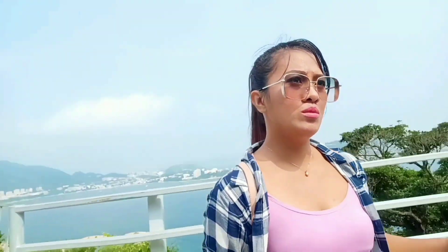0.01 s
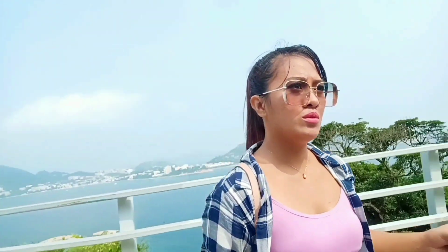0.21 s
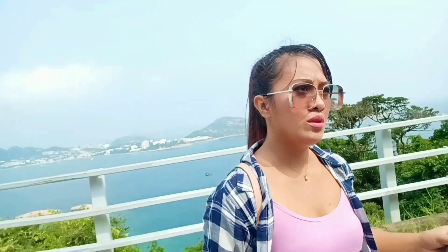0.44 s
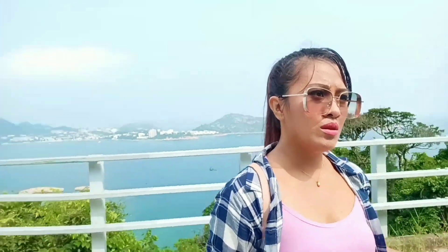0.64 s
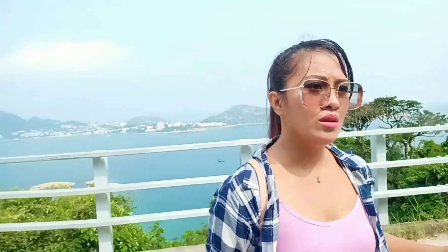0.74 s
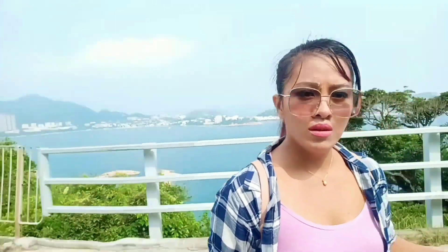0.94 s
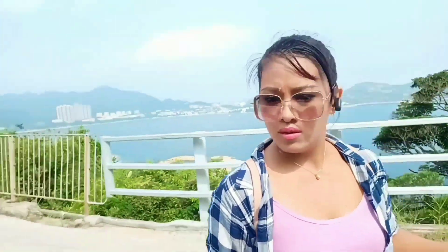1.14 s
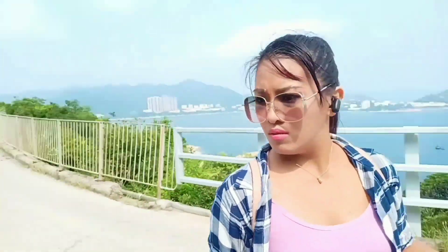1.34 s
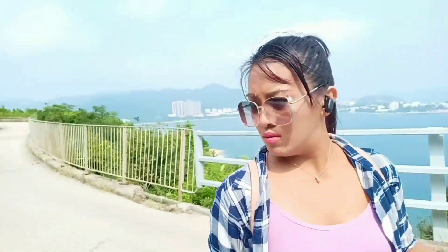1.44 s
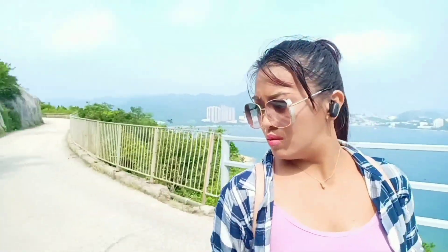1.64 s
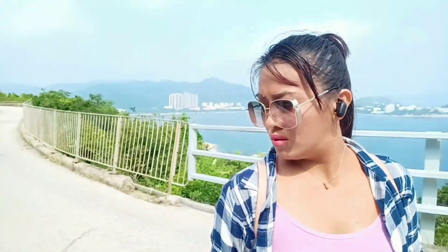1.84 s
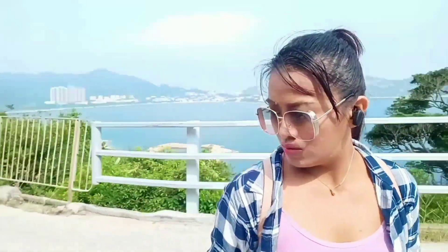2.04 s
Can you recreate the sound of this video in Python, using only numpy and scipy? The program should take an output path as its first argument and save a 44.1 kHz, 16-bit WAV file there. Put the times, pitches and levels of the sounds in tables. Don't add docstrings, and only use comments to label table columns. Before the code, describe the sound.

Wind rumbles and thuds against a phone's single microphone outdoors, while cicadas shrill continuously behind. A shoe crunches grit before the middle, small clicks follow, distant birds chirp faintly, and the thumps thin out.

```python
import sys
import numpy as np
from scipy import signal
from scipy.fft import rfft, irfft, next_fast_len
from scipy.io import wavfile
from scipy.ndimage import uniform_filter1d, minimum_filter1d

SR = 44100
rng = np.random.default_rng(int(sys.argv[2]) if len(sys.argv) > 2 else 0)


def level_to_linear(level):
    exponent = np.asarray(level, float) / 20
    return 10 ** exponent


def store_pcm(level_fs):
    pcm = np.round(np.clip(level_fs, -1, 1) * 32767).astype(np.int16)
    wavfile.write(sys.argv[1], SR, np.atleast_2d(pcm).T)


N = 92610
T = np.arange(N) / SR

# time_s, level_db
CHORUS_LEVEL = [(0.0, -55.5), (1.08, -49), (2.1, -56.5)]
CHORUS_HZ, CHORUS_SPREAD_HZ, CHORUS_WIDTH_HZ, CHORUS_CLICK_HZ, CHORUS_DB = 5128, 214, 203, 105, 0.5
# time_s, shift_hz
DRONE_DRIFT = [(0, 40.5), (.28, 60), (.4, -19), (.6, -50.5), (.68, -4.5), (.74, -120), (.9, 8.5), (1.4, 28),
               (1.6, -19.5), (1.76, 61.5), (1.9, -20), (2.1, 18)]
# peak_s, level_db
THROBS = [(.055, -53.5), (0.17, -46), (0.288, -46), (0.424, -46.5), (0.542, -43.5), (.645, -46.5),
          (0.759, -46.5), (.88, -51), (1.04, -58), (1.16, -56), (1.31, -47.5), (1.45, -50.5), (1.57, -53.5),
          (1.71, -49), (1.83, -50), (1.97, -54), (2.085, -49.5)]
THROB_RISE_S, THROB_FALL_S, THROB_FLATNESS = 0.05, 0.015, 3.2
NEAR_HZ, NEAR_CLICK_HZ, NEAR_BURST, NEAR_WIDTH_HZ, NEAR_STEEP_HZ = 5155, 110.4, 0.8, 200, 800

# peak_s, level_db, pitch_hz, width_ms
BUFFETS = [(0.216, -10.5, 118, 16.8), (0.243, -14.5, 124, 18.2), (0.277, -20.5, 91.5, 18),
           (0.358, -20.5, 94, 17), (0.371, -22.5, 95, 14), (0.4, -11.5, 130, 10), (0.434, -9.5, 86, 5.1),
           (0.448, -12.5, 135, 4.7), (0.465, -3, 147, 9.4), (0.484, -7.5, 69, 2.8), (0.5, -6, 83, 3.4),
           (0.528, -11.5, 105, 19.7), (0.555, -15, 146, 4.3), (0.566, -13, 105, 6.4), (0.579, -11, 95, 4.6),
           (0.591, -13, 130, 3.2), (0.615, -13.5, 77, 3.4), (0.695, -12, 110, 4.6), (0.751, -31, 100, 15),
           (0.792, -21.5, 105, 22), (0.837, -13.5, 79, 4.5), (0.975, -21, 108, 16),
           (1.003, -15.5, 108, 7.5), (1.038, -18, 109, 9.7), (1.052, -22, 75.4, 10.5),
           (1.142, -9.5, 101, 6.2), (1.16, -8.5, 100, 10.2), (1.212, -14, 96, 10.7),
           (1.368, -19.5, 122, 9.5), (1.503, -21, 86, 19.7), (0.044, -29, 77, 23), (.13, -32, 120, 22),
           (0.416, -18.5, 72, 14), (.72, -28, 90, 10), (.862, -24.5, 100, 12), (.92, -27.5, 93, 8.6),
           (.946, -24, 105, 15), (1.111, -24, 90, 12), (1.264, -25, 68.7, 23), (1.29, -22, 79, 27),
           (1.331, -28.5, 86, 24), (1.447, -24, 65, 20), (1.528, -24.5, 99, 5.4), (2.064, -34, 97, 14),
           (2.093, -24, 107, 8.7)]
BUFFET_DB, BUFFET_SPREAD, BUFFET_SAG, BUFFET_EDGE_DB = 0.5, 0.42, 13, -21.5
# time_s, level_db
GUST = [(0, -82), (.045, -37.5), (.08, -44.5), (.17, -33), (.33, -39), (.45, -21.5), (.62, -31),
        (.66, -42.5), (.75, -29), (.9, -36.5), (1.1, -36.5), (1.25, -36), (1.33, -30.5), (1.42, -39.5),
        (1.5, -33.5), (1.56, -48), (2.03, -54.5), (2.1, -42)]
# pitch_hz, density_db (per Hz)
RUMBLE_TONE = [(15, -47), (25, -17), (59, 4.5), (104, 4.5), (168, -5.5), (394, -23), (414, -48), (500, -40),
               (650, -69), (1100, -120)]
# pitch_hz, density_db (per Hz)
AIR_TONE = [(59, -52), (100, -0.5), (170, -5), (306, -7.5), (381, -10.5), (682, -17.5), (1180, -26),
            (4300, -36), (5590, -67), (9460, -120)]
RUMBLE_DB, AIR_DB, AIR_GUST_SHARE = 1.5, -45.5, 0.13
LULL_S, LULL_DB, LULL_WIDTH_S = 1.92, -4.5, 0.085

# length_s, level_db
SCUFFS = [
    (0.045, -54.5),
    (0.038, -58),
]
SCUFF_STARTS = [2.05, .34]
# start_s, level_db
CRUNCHES = [(0.7703, -28), (0.7733, -29.5), (.777, -36), (0.7796, -33), (.784, -30.5), (0.7882, -27.5),
            (0.7921, -35), (0.798, -32), (.8005, -44), (.806, -46), (0.81, -52)]
SCUFF_TAIL_S, CRUNCH_TAIL_S, CRUNCH_SNAP_DB, GRIT_GRAIN_DB = 0.006, 0.005, 2, 1
# pitch_hz, density_db (per Hz)
GRIT_TONE = [(240, -17), (450, -5), (1330, -5.5), (2210, -12), (2590, -26), (2860, -6.5), (4410, -9.5),
             (12500, -11), (15700, -32)]
# pitch_hz, width_hz, level_db
GRIT_RINGS = [(1960, 43, -5.5), (2330, 100, -6), (2820, 150, -10.5), (3810, 130, -7.5), (4450, 280, 2),
              (8000, 350, -7)]
# pitch_hz, width_hz, level_db, decay_ms
TICKS = [(4050, 700, -45, 3), (4200, 6000, -38, 1.2), (10500, 9000, -36, .6), (9000, 6900, -52, 3),
         (1940, 220, -55, 3), (5940, 900, -52, 2.1), (4400, 500, -48, 3)]
TICK_STARTS = [.845, 1.065, 1.2245, 1.233, 1.229, 1.593, .836]
# pitch_hz, width_hz, level_db
CLASP_RINGS = [
    (6250, 80, -47),
    (8900, 200, -45),
    (13300, 190, -48),
]
CLASP_KNOCKS = [
    1.2247,
    1.232,
]
CLASP_REBOUND_DB = 1

# length_s, end_pitch_hz, level_db
CHIRPS = [(.03, 3170, -66), (.03, 3150, -62), (.033, 3230, -57), (.03, 3200, -58), (.012, 3230, -60),
          (.04, 3130, -65), (.02, 2720, -61), (.02, 3230, -65), (.024, 3210, -60), (.03, 3200, -58),
          (.019, 3220, -61), (.014, 3220, -64), (.025, 3200, -67), (.03, 3180, -66)]
CHIRP_STARTS = [.265, .595, .875, .927, 1.042, 1.262, 1.322, 1.345, 1.388, 1.442, 1.484, 1.512, 1.995,
                2.025]
CHIRP_ATTACK_S, CHIRP_RELEASE_S, CHIRP_DB = 0.005, 0.01, 1.5
CHIRP_FALL, CHIRP_FALL_S, CHIRP_ROUGH_DB = 0.065, 0.012, 2
# start_s, length_s, pitch_hz, level_db
RASPS = [(0.443, 0.033, 2900, -48), (0.532, 0.04, 2620, -59), (1.425, 0.015, 3450, -63),
         (1.453, 0.033, 2700, -60), (1.52, .04, 2600, -65), (1.68, .11, 2600, -69)]
RASP_WIDTH_HZ, RASP_RATE_HZ, RASP_TAIL_S, RASP_BURST = 380, 190, 0.006, 0.9

# time_s, level_db
HIGH_LEVEL = [(0, -62), (.33, -60), (.5, -56.5), (.6, -54.5), (.82, -52), (1.05, -58.5), (1.4, -61.5),
              (1.54, -58.5), (1.6, -62.5), (1.86, -65), (2.0, -60.5), (2.1, -62)]
# time_s, level_db
TOP_LEVEL = [(0, -58), (.3, -55), (.6, -51.5), (1.3, -54), (1.35, -61), (1.72, -58), (1.86, -66.5),
             (2.0, -66), (2.1, -62.5)]
# pitch_hz, density_db (per Hz)
HIGH_TONE = [(5800, -25), (6500, -8.5), (7600, -4), (8400, 2), (9200, -1), (10600, -4.5), (11500, -10.5),
             (12300, -39)]
# pitch_hz, density_db (per Hz)
TOP_TONE = [(12300, -19.5), (13500, -20), (14800, -10), (15500, 1), (15750, -29)]
# pitch_hz, density_db (per Hz)
HISS_TONE = [(3500, 10), (7000, 3.9), (13000, 5.5)]
HIGH_DB, TOP_DB, HISS_DB = 3.5, -0.5, -64

BASS_CUT_HZ, TREBLE_CUT_HZ = 50, 15720
LIMIT_DB, LIMIT_RATIO, LIMIT_RELEASE_S, LOOKAHEAD_S = -17, 2, 0.004, 0.004


def unit(x):
    return x / np.sqrt(np.mean(x ** 2))


def curve(rows):
    return np.interp(T, *np.array(rows).T)


def noise():
    return rng.standard_normal(N)


def colour(x, points):
    hz, db = np.array(points, float).T
    size = next_fast_len(N)
    log_hz = np.log(np.maximum(np.arange(size // 2 + 1) * SR / size, 1))
    below = np.maximum(np.log(hz[0]) - log_hz, 0)
    above = np.maximum(log_hz - np.log(hz[-1]), 0)
    gain_db = np.interp(log_hz, np.log(hz), db) - 40 * (below + above)
    return unit(irfft(rfft(x, size) * level_to_linear(gain_db), size)[:N])


def ring(x, hz, width_hz):
    return signal.lfilter(*signal.iirpeak(hz, hz / width_hz, fs=SR), x)


def walk(rate_hz):
    k = int(SR / rate_hz)
    stairs = np.repeat(rng.standard_normal(N // k + 1), k)
    return 1.3 * uniform_filter1d(uniform_filter1d(stairs, k), k)[:N]


def gate(start, length, attack, release):
    return np.clip((T - start) / attack, 0, 1) * np.exp(-np.maximum(T - start - length, 0) / release)


def bump(centre_s, width_s):
    return np.exp(-0.5 * ((T - centre_s) / width_s) ** 2)


def tymbal(click_hz, burst):
    phase = (np.cumsum(click_hz * (1 + 0.0412 * walk(40))) / SR + rng.random()) % 1
    return np.exp(-phase / burst) * np.clip(phase / 0.07, 0, 1) * noise()


def chorus():
    many = 0
    for place, rate in zip(np.linspace(-1.5, 1.5, num=7), rng.standard_normal(7)):
        clicks = tymbal(CHORUS_CLICK_HZ * (1 + 0.12 * rate), 1.0)
        voice = ring(clicks, CHORUS_HZ + CHORUS_SPREAD_HZ * place, CHORUS_WIDTH_HZ)
        many = many + level_to_linear(0.61 * walk(6.7)) * ring(voice, CHORUS_HZ, 910)
    return level_to_linear(curve(CHORUS_LEVEL) + CHORUS_DB) * unit(many)


def near_cicada():
    throb = 0
    for s, db in THROBS:
        distance = np.abs((T - s) / np.where(T < s, THROB_RISE_S, THROB_FALL_S))
        throb = throb + level_to_linear(db) * np.exp(-0.5 * distance ** THROB_FLATNESS)
    voice = ring(tymbal(NEAR_CLICK_HZ, NEAR_BURST), NEAR_HZ, NEAR_WIDTH_HZ)
    return throb * unit(ring(voice, NEAR_HZ, NEAR_STEEP_HZ))


def cicadas():
    slide = np.exp(2j * np.pi * np.cumsum(curve(DRONE_DRIFT)) / SR)
    return np.real(signal.hilbert(chorus() + near_cicada()) * slide)


def buffets():
    out = 0
    for s, db, hz, ms in BUFFETS:
        u = T - s
        turn = 2 * np.pi * hz * u * (1 - BUFFET_SAG * np.clip(u, -0.02, 0.02)) + 0.84
        shape = bump(s, BUFFET_SPREAD * ms / 1000)
        edge = np.cos(2 * turn + 0.93) + 0.29 * shape * np.cos(3.26 * turn)
        out = out + level_to_linear(db + BUFFET_DB) * shape * (np.cos(turn) + level_to_linear(BUFFET_EDGE_DB) * shape * edge)
    return out


def lull():
    return LULL_DB * bump(LULL_S, LULL_WIDTH_S)


def wind():
    gust = curve(GUST)
    rumble = level_to_linear(gust + RUMBLE_DB) * colour(noise(), RUMBLE_TONE)
    air = colour(level_to_linear(1.27 * walk(14.66)) * noise(), AIR_TONE)
    slow_gust = uniform_filter1d(gust, SR // 4) - gust.mean()
    return rumble + buffets() + level_to_linear(AIR_DB + AIR_GUST_SHARE * slow_gust + lull()) * air


def grit_steps():
    grains = level_to_linear(GRIT_GRAIN_DB * (walk(900) + 0.067 * walk(198.4))) * noise()
    rings = sum(level_to_linear(db) * unit(ring(grains, hz, width_hz)) for hz, width_hz, db in GRIT_RINGS)
    grit = unit(colour(grains, GRIT_TONE) + unit(rings))
    level = 0
    for s, (length, db) in zip(SCUFF_STARTS, SCUFFS):
        level = level + level_to_linear(db) * gate(s, length, 0.00058, SCUFF_TAIL_S)
    for s, db in CRUNCHES:
        snap = level_to_linear(CRUNCH_SNAP_DB) * gate(s, 0, 0.0001, 0.00032)
        level = level + level_to_linear(db) * (gate(s, 0, 0.0002, CRUNCH_TAIL_S) + snap) / 2
    return level * grit


def ticks():
    out = 0
    knock = sum(level_to_linear(CLASP_REBOUND_DB * k) * (np.arange(N) == int(s * SR)) for k, s in enumerate(CLASP_KNOCKS))
    for hz, width_hz, db in CLASP_RINGS:
        out = out + level_to_linear(db) * ring(knock, hz, width_hz) * SR / (2 * np.pi * width_hz)
    for s, (hz, width_hz, db, ms) in zip(TICK_STARTS, TICKS):
        burst = gate(s, 0.00047, 0.00018, ms / 1000) * noise()
        tick = ring(ring(burst, hz, width_hz), hz, width_hz)
        out = out + level_to_linear(db) * tick / np.abs(tick).max()
    return out


def birds():
    out = 0
    rough = level_to_linear(CHIRP_ROUGH_DB * walk(150))
    for s, (length, hz, db) in zip(CHIRP_STARTS, CHIRPS):
        fall = CHIRP_FALL * np.exp(-np.maximum(T - s, 0) / CHIRP_FALL_S)
        whistle = np.sin(2 * np.pi * np.cumsum(hz * (1 + fall + 0.0067 * walk(200))) / SR)
        out = out + level_to_linear(db + CHIRP_DB) * gate(s, length, CHIRP_ATTACK_S, CHIRP_RELEASE_S) * rough * whistle
    for s, length, hz, db in RASPS:
        pulses = tymbal(RASP_RATE_HZ, RASP_BURST) + tymbal(RASP_RATE_HZ, RASP_BURST)
        buzz = ring(ring(pulses, hz, RASP_WIDTH_HZ), hz, 2 * RASP_WIDTH_HZ)
        out = out + level_to_linear(db) * gate(s, length, 0.0035, RASP_TAIL_S) * unit(buzz)
    return out


def insect_buzz(click_hz):
    return tymbal(click_hz, 1.0) + tymbal(0.79 * click_hz, 1.0)


def high_insects():
    high = level_to_linear(curve(HIGH_LEVEL) + HIGH_DB + 1.6 * walk(30.8)) * colour(insect_buzz(210), HIGH_TONE)
    top = level_to_linear(curve(TOP_LEVEL) + TOP_DB + walk(26.4)) * colour(insect_buzz(160), TOP_TONE)
    hiss = level_to_linear(HISS_DB + lull() + 2 * walk(15.1)) * colour(noise(), HISS_TONE)
    return high + top + hiss


def scene():
    return (cicadas() + wind() + grit_steps() + ticks() + birds() + high_insects())[None, :]


def band_limit(x):
    return signal.sosfilt(signal.butter(12, 16790, fs=SR, output="sos"), x)


def record(dry):
    dry = signal.sosfilt(signal.butter(2, BASS_CUT_HZ, "high", fs=SR, output="sos"), dry)
    dry = signal.sosfilt(signal.ellip(10, 0.3, 80, TREBLE_CUT_HZ, fs=SR, output="sos"), dry)
    span = int(LIMIT_RELEASE_S * SR)
    held_peak = -minimum_filter1d(-np.abs(dry), span, axis=1)
    peak = uniform_filter1d(held_peak, span, axis=1)
    duck = np.minimum(level_to_linear(LIMIT_DB) / (peak + 1e-9), 1) ** (1 - 1 / LIMIT_RATIO)
    duck = np.roll(duck, -int(LOOKAHEAD_S * SR), axis=1)
    low = signal.sosfiltfilt(signal.butter(2, 600, fs=SR, output="sos"), dry)
    return band_limit(low + (dry - low) * duck)


dry = scene()
out = record(dry)
store_pcm(out)
```